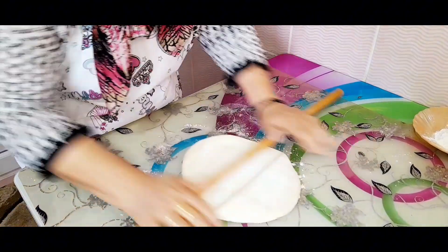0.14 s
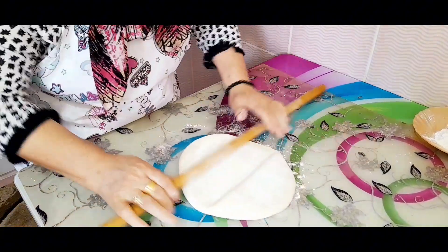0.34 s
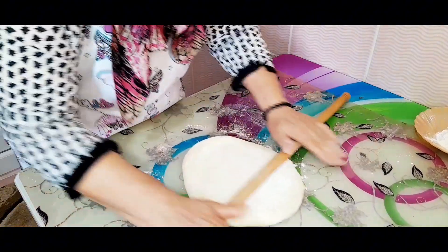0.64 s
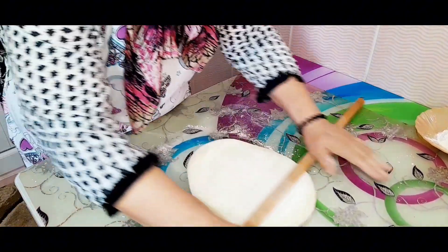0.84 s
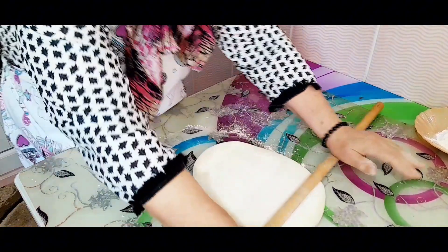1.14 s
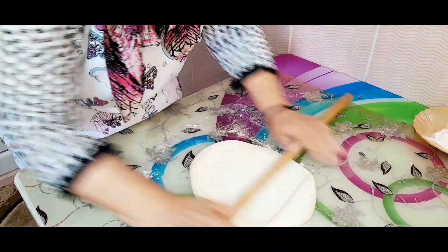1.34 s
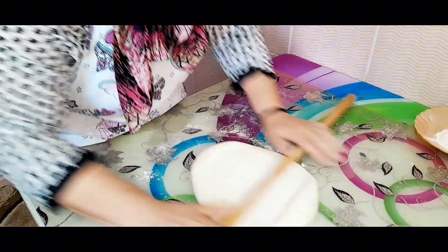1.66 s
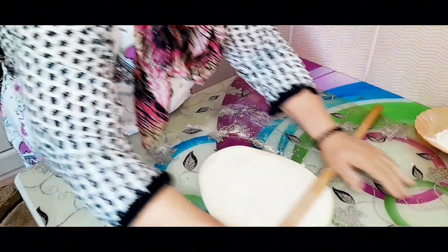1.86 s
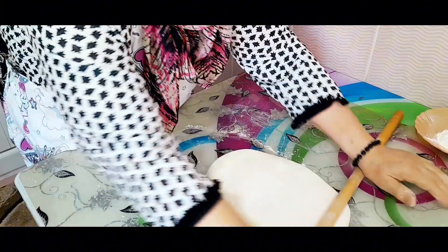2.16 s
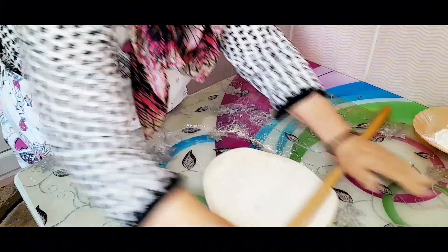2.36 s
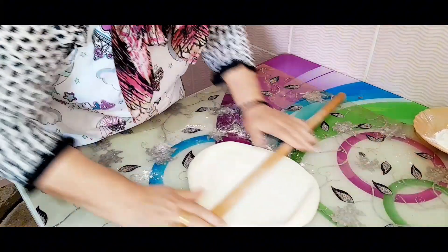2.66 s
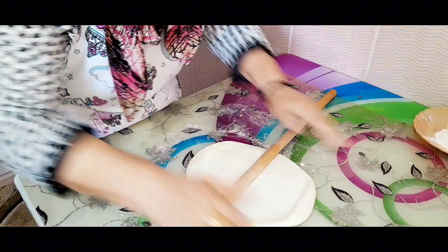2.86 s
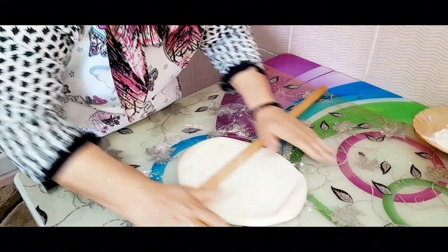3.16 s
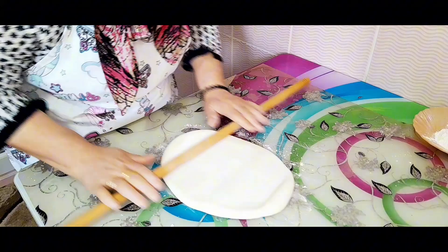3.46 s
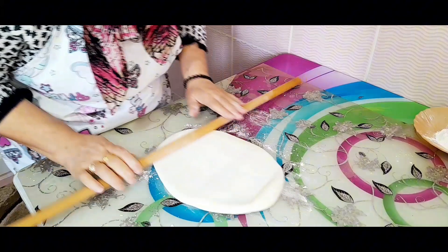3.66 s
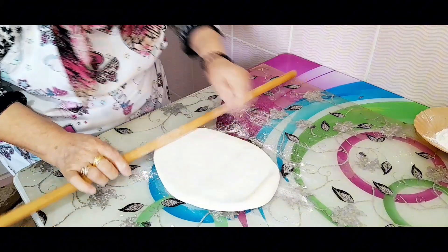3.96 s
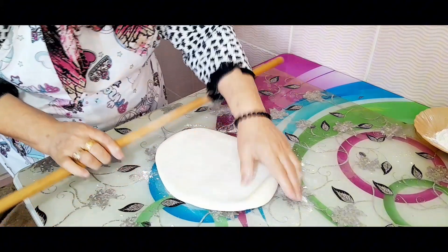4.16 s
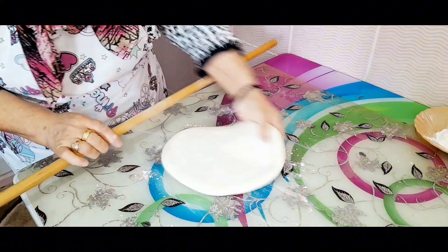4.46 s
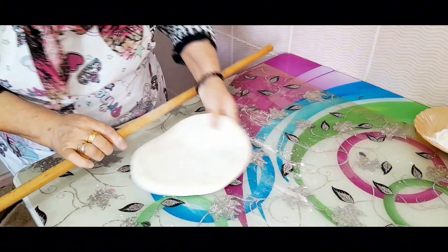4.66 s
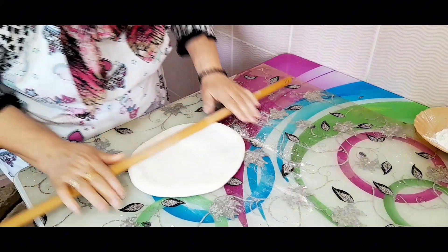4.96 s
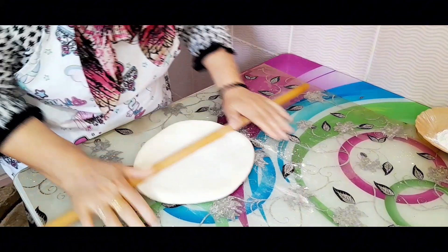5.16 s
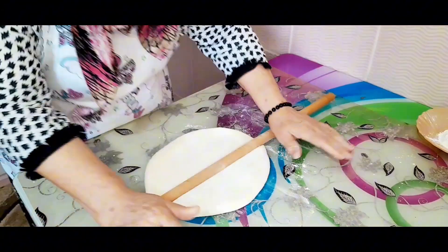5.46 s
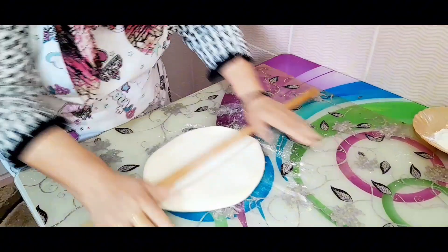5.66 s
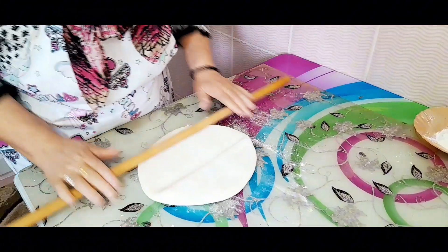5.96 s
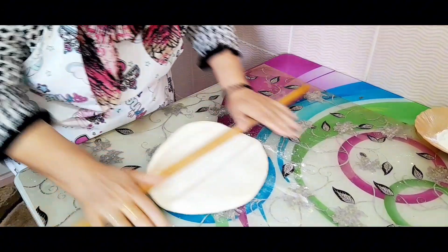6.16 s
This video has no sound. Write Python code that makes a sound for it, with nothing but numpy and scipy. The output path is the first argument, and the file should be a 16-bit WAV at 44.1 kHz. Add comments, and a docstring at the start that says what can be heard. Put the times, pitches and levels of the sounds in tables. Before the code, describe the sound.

Low rolling rumble and brushing sleeves, broken by wooden knocks on glass, one very loud midway, with dull thuds and light metallic ticks.

```python
"""A small tiled kitchen, with a two-port microphone near a glass table where a thin pin rolls dough; 6.3 s.
Room noise, rolling boom and rumble, and the rustle of sleeves and floury palms run throughout.
At 0.1 s a faint wooden rattle, then ring clinks; at 0.5 s a sharp knock and the first palm thud.
Weaker knocks follow until the loudest at 3.0 s, with a bright clink; the last knock falls at 3.7 s.
To the end come clinks and thuds. Blows excite resonant modes and echo; steady sounds are shaped noise or a sine."""
import sys
import numpy as np
from scipy import signal
from scipy.fft import rfft, irfft, next_fast_len
from scipy.io import wavfile
from scipy.ndimage import uniform_filter1d, map_coordinates

SR = 44100
rng = np.random.default_rng(int(sys.argv[2]) if len(sys.argv) > 2 else 0)


def dump_mix(stems):
    """Bounce the given channels to the path in sys.argv[1] as a 16-bit WAV at rate SR."""
    frames = np.atleast_2d(stems).T  # one column per channel
    limited = np.clip(frames, -1, 1)  # hard clip at full scale
    pcm = np.round(limited * 32767).astype(np.int16)
    wavfile.write(sys.argv[1], SR, pcm)


N = 278271
BLOW_SAMPLES = 24000  # one blow with its echoes

# Steady noise of the place: f/Hz, relative density/dB per Hz
ROOM_SPECTRUM = [(15, -40), (30, -30), (45, 2.5), (65, -2), (85, -5), (127, -2), (165, -19.5), (256, -5.5),
                 (440, -13), (820, -11.5), (1000, -13), (1700, -19.5), (2400, -27), (3200, -25.5),
                 (5000, -20.5), (10000, -35.5), (16000, -57.5)]
ROOM_LEVEL_DB = -56.5
# Echoes of the kitchen: f/Hz, t60/s
KITCHEN_DECAY = [(100, 0.76), (500, 0.47), (2000, 0.36), (5000, 0.25), (12000, 0.1)]
# Likeness of the two microphone ports: f/Hz, left-right correlation
PORT_LIKENESS = [(30, 0.89), (120, 0.88), (300, 0.79), (600, 0.47), (1200, -0.14), (2500, 0.033),
                 (5000, -0.18), (16000, 0.045)]
# Sleeves and floury palms: f/Hz, relative density/dB per Hz
RUSTLE_SPECTRUM = [(800, -18), (2000, 2.5), (3000, -2.5), (4500, 3.5), (6500, -0.5), (9500, -6.5),
                   (12000, -3.5), (16000, -8)]
# Pin rolling on the table: f/Hz, relative density/dB per Hz
RUMBLE_SPECTRUM = [(120, -6), (250, 0.5), (500, -5.5), (900, -12), (1600, -18), (3000, -44)]
# Steady work of pin and arms: t/s, table boom level/dB, rumble level/dB, rustle level/dB
WORK_LEVELS = [(0.0, -64, -66, -82), (0.2, -59, -52.5, -61), (0.43, -69, -59.5, -73),
               (0.62, -58, -48, -59.5), (1.03, -66, -64.5, -71), (1.15, -53, -52, -73),
               (1.5, -74, -52.5, -62.5), (1.94, -74, -55.5, -66), (2.1, -63, -52, -66),
               (2.4, -70, -61, -70.5), (2.62, -54, -53, -60), (2.94, -86, -63.5, -77),
               (3.12, -45.5, -48, -61.5), (3.5, -62, -59, -67.5), (3.75, -73, -64.5, -59),
               (4.08, -70, -60, -73.5), (4.55, -57.5, -60, -59.5), (5.25, -73, -59, -66.5),
               (5.4, -60, -53, -63), (5.99, -75, -66, -75), (6.09, -52, -52, -59),
               (6.31, -72, -56.5, -60.5)]
# Palms skid over flour after a blow: t/s, level/dB, time to fall to 1/e/s
PALM_SKIDS = [(0.203, -68, 0.11), (0.44, -59, 0.038), (0.487, -49.5, 0.098), (1.42, -50, 0.077),
              (1.598, -60, 0.076), (1.979, -58, 0.073), (2.598, -58, 0.045), (2.626, -52, 0.055),
              (2.97, -45.5, 0.11), (3.39, -63, 0.086), (4.185, -61.5, 0.069), (4.672, -52.5, 0.086),
              (4.932, -55, .05), (5.798, -62.5, 0.087)]
# Weight leans onto the pin and the boom swells: peak t/s, boom level/dB, rise from 1/e/s
WEIGHT_LEANS = [(0.74, -43.5, 0.035), (1.365, -43, 0.07), (1.455, -43.5, 0.025), (1.86, -50, 0.12),
                (2.22, -53.5, .08), (3.82, -61, 0.054), (3.99, -60, 0.036), (5.389, -48, 0.073)]
LIFT_S = 0.037  # fall to 1/e: the weight comes off quickly
# Modes of the table top: f/Hz, level/dB, t60/s before the damping of each contact
TABLE_MODES = [(67.7, -2.5, 0.14), (123.6, 0.5, 0.45), (178.5, -8.5, 0.35), (259.4, 2, 0.18),
               (343.3, 0.5, 0.12), (361, 4, 0.15), (454, -1.5, 0.169), (522, 2, 0.091), (540, -12.5, 0.24),
               (716, 0, 0.074), (776, -1.5, 0.027), (890, -15, 0.084)]
# The top gives way once under a contact; the knock level is relative to the knock's peak
JOLT_HZ, JOLT_T60_S, KNOCK_JOLT_DB = 199.5, 0.043, -10.5
# Soft pushes into the table, and at 5.792 s the table's low body under a ring clink: t/s, boom level/dB, body
# level/dB, jolt level/dB
PALM_THUDS = [(0.517, -35, -46, -38), (0.765, -48, -41.5, -60), (0.79, -54, -44.5, -62),
              (1.557, -43, -58, -36), (2.108, -45, -53, -53), (2.653, -53, -56, -41),
              (4.153, -35, -56, -45), (4.391, -42.5, -58, -43), (5.034, -54, -59, -30.5),
              (5.054, -43, -62, -38.5), (5.279, -45, -39, -44), (5.315, -42, -41, -53),
              (5.668, -46.5, -57.5, -41), (5.792, -50.5, -51.5, -55), (6.011, -44.5, -65, -51),
              (6.117, -41, -42, -52), (6.145, -46, -42.5, -55), (6.165, -38.5, -43.5, -40)]
# Metal rings and the pin under them: f/Hz, width/Hz, level/dB
RING_MODES = [(1030, 210, -5), (1667, 100, 6), (2190, 140, -2), (2710, 170, -7.5), (3410, 210, -1.5),
              (4175, 280, 2.5), (4590, 740, 1), (4906, 1100, -1.5), (7030, 810, -1.5), (7700, 1000, 0),
              (12120, 3500, -5), (13100, 3800, -4)]
# Rings on the pin: t/s, peak level/dB, low and top mode levels/dB re middle modes,
# rattle t60/s (held to 0.001-0.2), left-right difference/dB
RING_CLINKS = [(0.2322, -45.5, 15, -6, 0.015, -1), (0.248, -42, 11, -11, 0.0051, 17),
               (0.4882, -29, 0.5, -17, 0.066, 11), (1.4155, -35, 3, -16, 0.028, 18.5),
               (1.47, -50, -11, -5, .015, 1), (1.641, -50, -8, -1, 0.017, 8),
               (2.5876, -38.5, 12, -12, 0.026, 3), (2.598, -35, 17, -16, 0.0037, 23),
               (2.63, -47, -4, -10, 0.051, 0), (2.964, -18, -14.5, -11.5, 0.026, -6),
               (3.392, -42, 5, -14, 0.007, -17), (4.201, -50.5, -8, 2, 0.013, -1),
               (4.386, -53, -3, -4, .006, -3), (4.6733, -36.5, -8, 2, 0.0095, 12),
               (4.9343, -33.5, -7.5, -14, 0.0086, 8), (4.944, -37.5, 0.5, -17, 0.015, -2),
               (5.7902, -34, 2, -10, 0.018, -6), (6.031, -43, 0.5, -16, 0.0078, -13)]
# Broad modes of the wooden pin: f/Hz, width/Hz, level/dB
PIN_MODES = [(515, 122, 0.5), (1220, 430, 0), (2160, 1580, -3.5), (3820, 1940, -2.5), (5020, 2250, -6),
             (7430, 2400, -17), (11000, 19000, -33)]
# Pin on glass: t/s, peak level/dB, boom and body levels/dB re peak, brightness/dB per octave,
# rattle t60/s (held to 0.001-0.2), left-right difference/dB
PIN_KNOCKS = [(0.118, -40.5, -10, -19, -5, 0.046, 0), (0.4968, -18.5, -14, -24, 1.5, 0.0011, 5),
              (0.7281, -30.5, -14, -26, -1, 0.0035, 4), (1.230, -47.5, -14, -26, -10, 0.0014, 6),
              (1.600, -39.5, -39, -11, -3, 0.062, 0), (1.7606, -29.5, -11, -27, -1, 0.0076, 4),
              (1.9781, -40.5, -14, -5.5, 0.5, 0.28, 1), (2.6375, -29.5, -13.5, -21.5, -1, 0.0012, 4),
              (2.9789, -7, -16.5, -27, 4.5, 0.01, 1), (3.243, -42.5, -10, -19, -6, 0.0043, 1),
              (3.676, -29.5, -16.5, -19, -2, 0.0072, 1)]


def amp(db):
    """dB to gain."""
    return 10 ** (np.asarray(db) / 20)


def unit(x):
    """Scaled to rms 1."""
    return x / np.sqrt(np.mean(x ** 2) + 1e-20)


def along(points, hz):
    """Interpolate (f/Hz, value) points on a log frequency axis."""
    f, value = np.transpose(points)
    return np.interp(np.log(hz + 1), np.log(f + 1), value)


def wobble(rate):
    """A smooth random curve with rate knots a second."""
    knots = rng.standard_normal(int(N * rate / SR) + 4)
    return map_coordinates(knots, [np.arange(N) * rate / SR])


def filtered(x, response):
    """Apply a complex frequency response to x."""
    n = x.shape[-1]
    size = next_fast_len(n + 8192)
    spectrum = rfft(x, size) * response(np.fft.rfftfreq(size, 1 / SR))
    return irfft(spectrum, size)[..., :n]


def paired(pair):
    """Two unrelated signals become the two ports, alike mainly in the bass."""
    def mid_side_gains(hz):
        turn = np.arccos(np.clip(along(PORT_LIKENESS, hz), -1, 1)) / 2
        return np.array([np.cos(turn), np.sin(turn)])

    mid, side = filtered(pair, mid_side_gains)
    return np.array([mid + side, mid - side])


def rush(spectrum, patchy_db):
    """Stereo noise of rms 1, shaped by spectrum, with time-frequency patches of random gain."""
    z = signal.stft(rng.standard_normal((2, N)), nperseg=512)[2]
    patches = uniform_filter1d(rng.standard_normal(z.shape[1:]), 6, 0)
    patches = uniform_filter1d(patches, 10, 1)
    pair = signal.istft(z * amp(patchy_db * unit(patches)), nperseg=512)[1][:, :N]
    return unit(paired(filtered(pair, lambda hz: amp(along(spectrum, hz)))))


def add(out, s, db, sound, colour, pan_db, wet_db):
    """Place a blow in the kitchen with an echo tail of noise, each frequency dying at its own speed."""
    hz, t, z = signal.stft(rng.standard_normal((2, BLOW_SAMPLES)), SR, nperseg=256)
    decay = amp(-60 * t / along(KITCHEN_DECAY, hz)[:, None])
    tail = paired(signal.istft(z * decay, SR, nperseg=256)[1])
    tail *= 1 - np.exp(-np.arange(tail.shape[1]) / SR / 0.0041)  # the nearest walls answer after a few ms
    tail /= np.linalg.norm(tail[0])
    wet = signal.fftconvolve(colour[None], tail, axes=1)[:, :BLOW_SAMPLES]
    direct = sound * amp([[pan_db / 2], [-pan_db / 2]])
    out[:, round(s * SR):][:, :BLOW_SAMPLES] += amp(db) * (direct + amp(wet_db) * wet)


def resonances(modes, lift_db=0):
    """Causal summed response of damped modes, signs alternating from mode to mode."""
    hz, width, db = np.transpose(modes)[:, :, None]
    gain = (-1) ** np.arange(len(modes))[:, None] * amp(db + lift_db)
    return lambda f: (gain * 1j * f * width / (hz * hz - f * f + 1j * f * width)).sum(0)


def struck(response, length):
    """A sharp contact and a noise blur falling 60 dB in length seconds, of peak 1;
    also the bare ring at the same energy, which is the colour that fills the room."""
    u = np.arange(BLOW_SAMPLES) / SR / np.clip(length, 1e-3, .2)
    blur = (1 - np.exp(-25 * u)) * amp(-60 * u) * rng.standard_normal(BLOW_SAMPLES)
    blur[0] = 4  # the sharp contact
    sound, bare = filtered(np.array([blur, u == 0]), response)
    sound = sound / np.abs(sound).max()
    return sound, bare * np.linalg.norm(sound) / np.linalg.norm(bare)


def table(boom_db, body_db, cycles, damping):
    """The table top: deep modes boom, higher ones give a short body; each builds up over a few cycles."""
    hz, db, t60 = np.transpose(TABLE_MODES)[:, :, None]
    t = np.arange(BLOW_SAMPLES) / SR
    db = db + np.where(hz < 200, boom_db, body_db) + rng.standard_normal(hz.shape)
    ring = amp(db - 60 * damping * t / t60) * np.sin(2 * np.pi * hz * t)
    return (ring * (1 - np.exp(-t * hz / cycles))).sum(0)


def jolt(db):
    """The table top gives way once under a contact: a short decaying sine."""
    t = np.arange(BLOW_SAMPLES) / SR
    ring = amp(db - 60 * t / JOLT_T60_S) * np.sin(2 * np.pi * JOLT_HZ * t)
    return ring * (1 - np.exp(-t / 0.0014))


def room_noise():
    """The kitchen's steady noise: shaped, slightly patchy noise at both ports."""
    return amp(ROOM_LEVEL_DB) * rush(ROOM_SPECTRUM, patchy_db=2.6)


def work_level_db(column):
    """One level of the steady work, interpolated over time."""
    points = np.transpose(WORK_LEVELS)
    return np.interp(np.arange(N) / SR, points[0], points[column])


def rustle():
    """Cloth and flour rub as fluttering noise; palm skids start suddenly and stop quickly."""
    t = np.arange(N) / SR
    skid = sum(amp(db) * (t > s) * np.exp(-(np.abs(t - s) / length) ** 2.4) for s, db, length in PALM_SKIDS)
    level = np.hypot(amp(work_level_db(3)), skid)
    return amp(1.62 * wobble(45)) * level * rush(RUSTLE_SPECTRUM, patchy_db=1.0)


def rolling_rumble():
    """The rolling pin rumbles on the table as low noise of uneven level."""
    return amp(work_level_db(2) + 1.7 * wobble(25)) * rush(RUMBLE_SPECTRUM, patchy_db=2.5)


def rolling_boom():
    """Rolling drives one main table mode, a sine that swells as weight leans onto the pin."""
    t = np.arange(N) / SR
    lean = sum(amp(db) * np.exp(-((t - s) / np.where(t < s, rise, LIFT_S)) ** 2)
               for s, db, rise in WEIGHT_LEANS)
    hz = TABLE_MODES[1][0] + 4.52 * wobble(16)  # uneven pushing makes the mode waver
    level = amp(work_level_db(1) + 3.9 * wobble(5.8)) + lean
    return np.sqrt(2) * level * np.sin(2 * np.pi * np.cumsum(hz) / SR)


def thuds(out):
    """Palms and dough push the table softly and, resting on it, damp its ring; one contact gives the low body
    under a ring clink."""
    for s, boom_db, body_db, jolt_db in PALM_THUDS:
        push = table(boom_db, body_db, cycles=0.75, damping=1.76) + jolt(jolt_db)
        add(out, s, 0, push, push, 0, wet_db=-9)


def clinks(out):
    """Finger rings rattle on the pin; each contact favours the low, middle or top modes."""
    hz = np.transpose(RING_MODES)[0][:, None]
    for s, db, low_db, top_db, length, pan_db in RING_CLINKS:
        group_db = np.where(hz < 3000, low_db, np.where(hz > 7000, top_db, 0))
        clink, colour = struck(resonances(RING_MODES, group_db), length)
        add(out, s, db, clink, colour, pan_db, wet_db=3.0)


def knocks(out):
    """The pin clacks on glass through its broad wooden modes and sets the table ringing."""
    octaves = np.log2(np.transpose(PIN_MODES)[0][:, None] / 2000)
    for s, db, boom_db, body_db, bright_db, length, pan_db in PIN_KNOCKS:
        wood = resonances(PIN_MODES, bright_db * octaves)  # harder contact, more treble

        def clack_response(f):
            echo = 1 + .5 * np.exp(-2j * np.pi * f * 0.00131)  # a near surface sends the clack again
            return wood(f) * echo / (1 + 1j * f / 6000) ** 2

        clack, colour = struck(clack_response, length)
        top = table(boom_db, body_db, cycles=1.0, damping=0.76) + jolt(KNOCK_JOLT_DB)
        add(out, s, db, clack, colour + 0.31 * top, pan_db, wet_db=0.0)
        out[:, round(s * SR):][:, :BLOW_SAMPLES] += amp(db) * top  # the table itself sounds centred


def scene():
    """Room noise, the steady work, then the blows of palms, rings and pin."""
    steady = room_noise() + rustle() + rolling_rumble() + rolling_boom()
    blows = np.zeros((2, N + BLOW_SAMPLES))
    thuds(blows)
    clinks(blows)
    knocks(blows)
    return steady + blows[:, :N]


def record(dry):
    """The microphone: weak deep bass below about 80 Hz, nothing from 15850 Hz up."""
    return filtered(dry, lambda hz: (hz < 15850) * (1j * hz / (35 + 1j * hz)) ** 4)


dry = scene()
out = record(dry)
dump_mix(out)
```